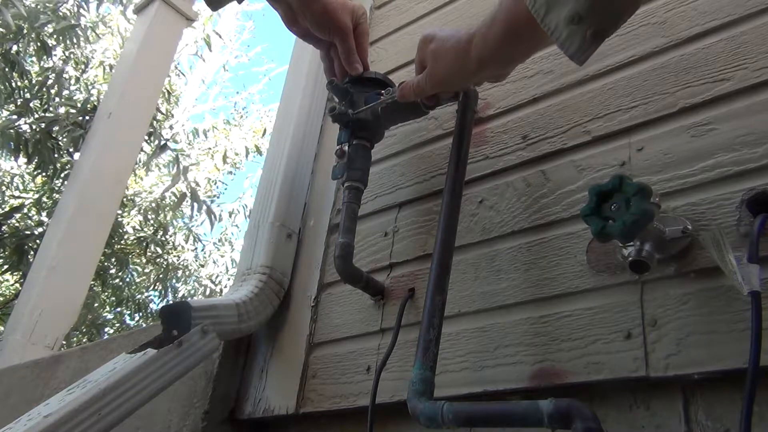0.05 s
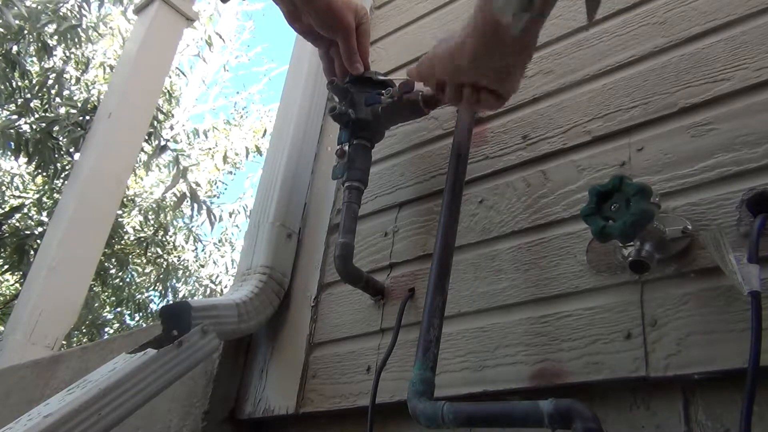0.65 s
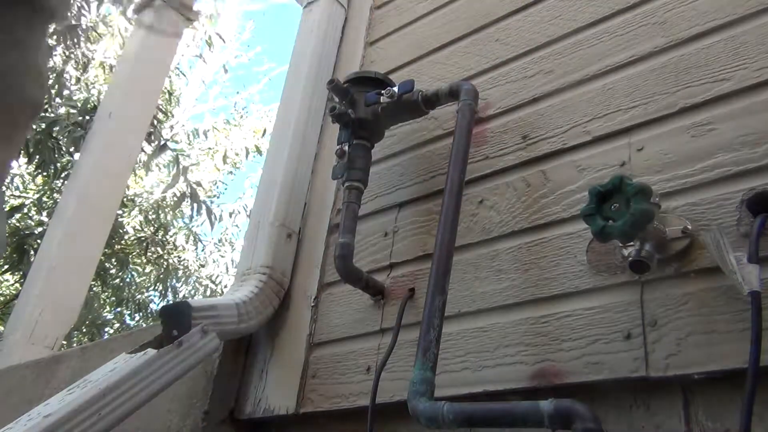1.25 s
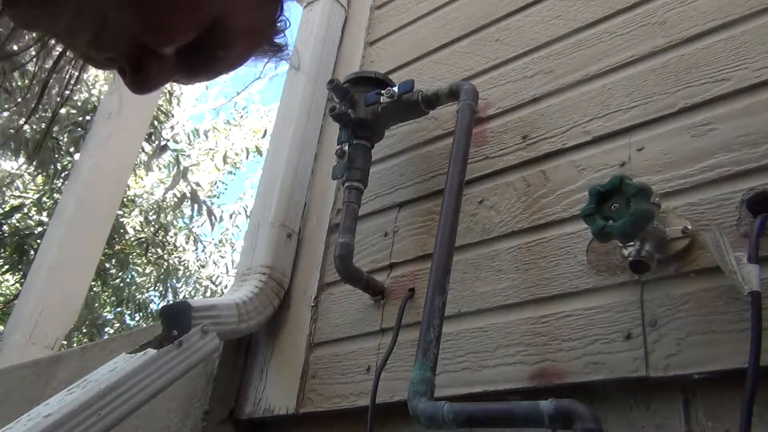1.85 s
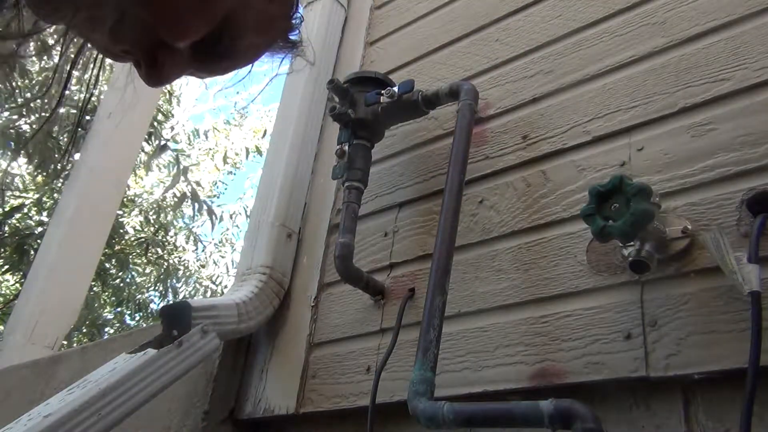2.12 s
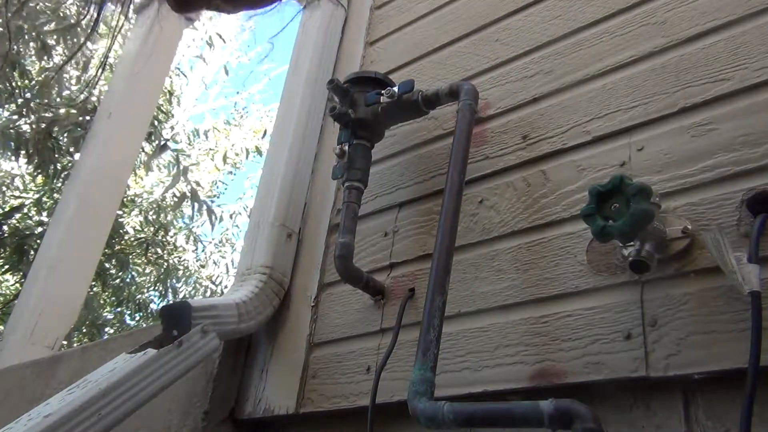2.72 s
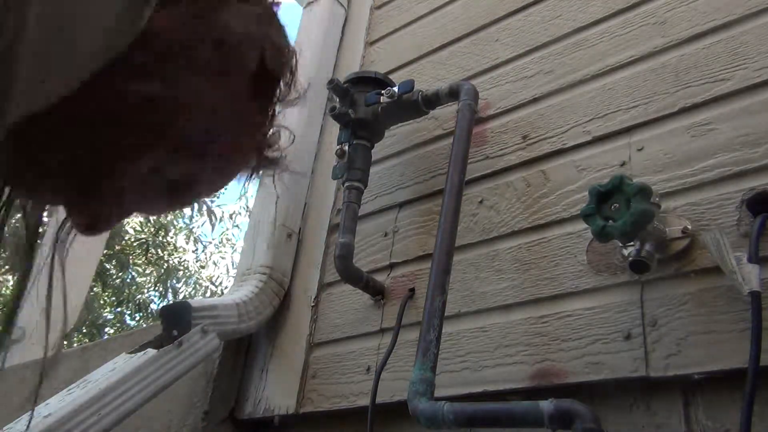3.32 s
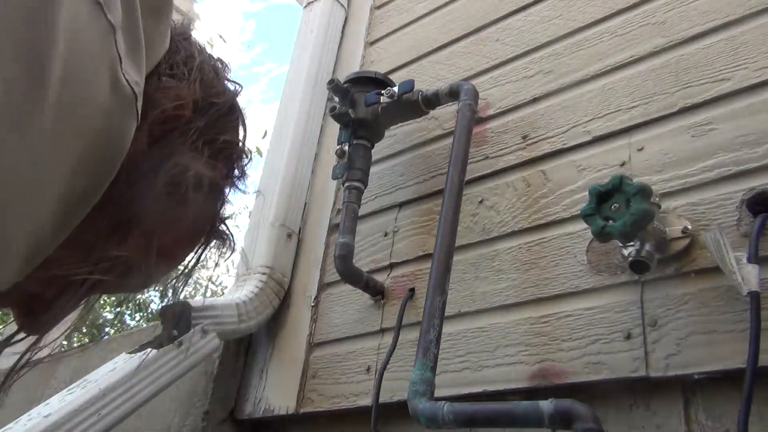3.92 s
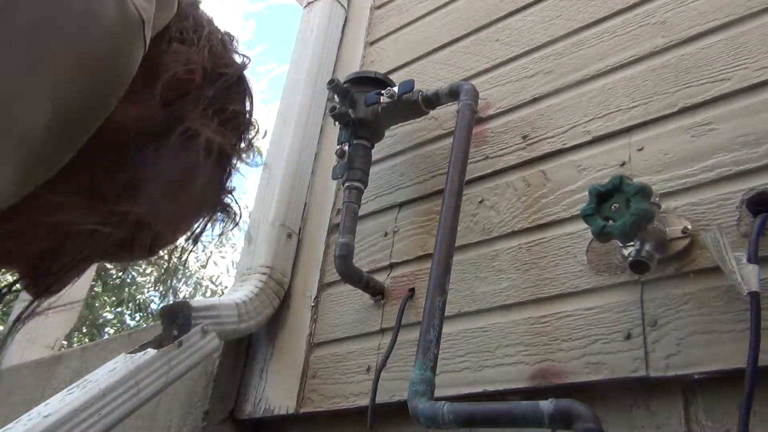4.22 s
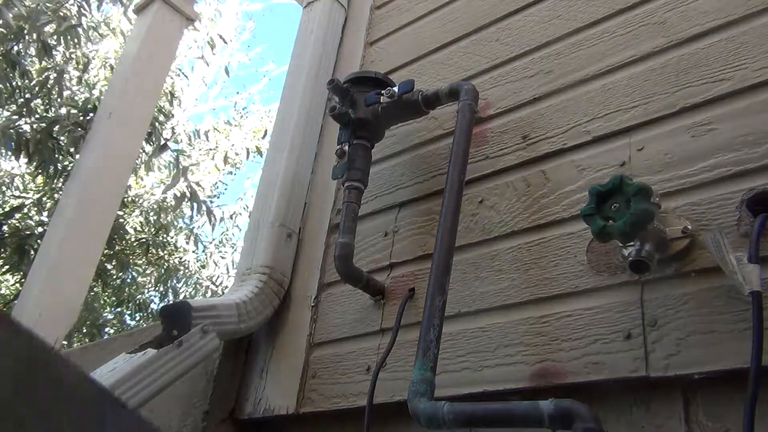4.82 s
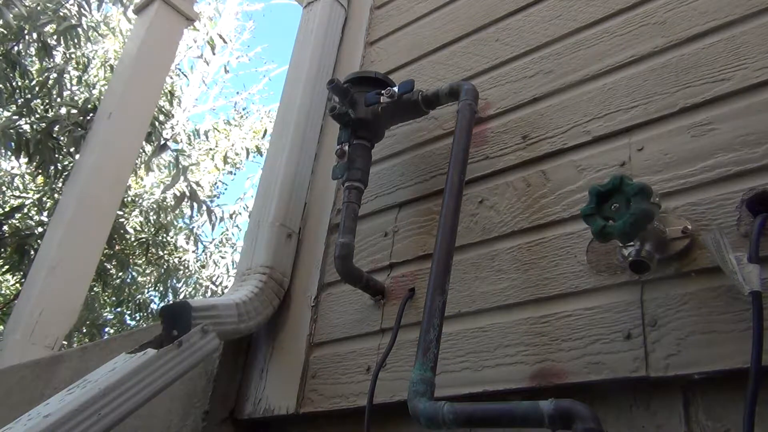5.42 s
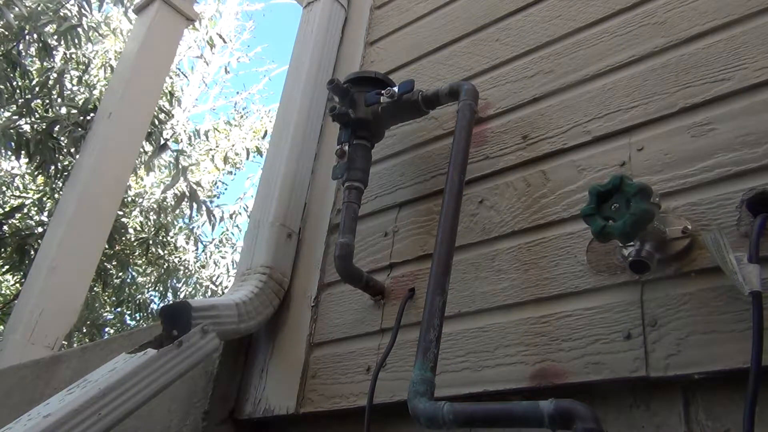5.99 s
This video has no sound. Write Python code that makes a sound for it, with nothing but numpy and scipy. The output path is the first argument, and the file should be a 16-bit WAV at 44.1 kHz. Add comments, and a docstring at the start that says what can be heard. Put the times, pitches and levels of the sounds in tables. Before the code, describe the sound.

Beside a house wall, a small metal valve on a pipe gives a few sharp clicks and a very faint squeak. Then a jacket moves right at the stereo microphone, rustling, crackling, rubbing and bumping on it with hollow knocks. Near the end the cloth drags loudly across the microphone twice. A faint, high insect buzz pulses over a soft outdoor hush throughout.

```python
"""Sprinkler valves and a close jacket

Beside a house wall, a hand works the small metal valves of a sprinkler pipe: a few sharp clicks.
Then someone moves right at the camera's stereo microphones: a jacket rustles, snaps, rubs and bumps
on the case and twice drags along it. One curve of body movement and a few held strokes drive the
cloth's friction. Farther off, an insect buzzes in the garden throughout."""
import sys
import numpy as np
from scipy import signal
from scipy.fft import rfft, irfft
from scipy.io import wavfile
from scipy.ndimage import uniform_filter1d

SR = 44100
rng = np.random.default_rng(int(sys.argv[2]) if len(sys.argv) > 2 else 0)


def to_wav(s):
    """Save 16-bit WAV."""
    ch = np.atleast_2d(s).T  # columns
    pcm = np.round(np.clip(ch, -1, 1) * 32767)  # PCM
    wavfile.write(sys.argv[1], SR, pcm.astype(np.int16))


N = 267025
TIME = np.arange(N) / SR
OPPOSED = np.array([[1], [-1]])  # opposite polarity in the left and right microphones

# how much the jacket moves, as the relative level of its hiss: t/s, level/dB
BODY_MOVEMENT = [(0.0, -60), (0.81, -59), (1.68, -48.5), (1.8, -43), (2.02, -42), (2.37, -56), (2.81, -47),
                 (2.95, -54), (3.17, -52), (3.42, -48.5), (3.61, -42), (3.94, -48), (4.19, -40),
                 (4.53, -49), (4.92, -43), (5.17, -49.5), (5.68, -54.5), (6.05, -54.5)]
# a sleeve brushes over the jacket: start/s, length/s, level/dB
SLEEVE_BRUSHES = [(0.81, 0.11, -46.5), (1.105, 0.043, -43.5), (1.27, 0.07, -47), (1.705, 0.18, -37.5),
                  (2.113, 0.058, -32), (2.465, 0.013, -36.5), (2.525, 0.018, -43), (2.618, 0.017, -41.5),
                  (2.699, .04, -39), (2.764, 0.05, -36.5), (2.915, 0.078, -40), (3.61, 0.058, -41.5),
                  (4.676, 0.072, -53)]
# the jacket rubs on the camera: start/s, length/s, scrape/dB, rumble/dB
CASE_RUBS = [(0, 0.014, -44, -41.5), (1.49, 0.14, -60, -42), (1.606, 0.041, -29.5, -31),
             (1.648, .02, -35.5, -21), (1.733, 0.055, -39, -28.5), (1.796, .15, -31, -22),
             (2.083, 0.024, -39, -20.5), (2.2, 0.16, -38.5, -60), (3.165, 0.028, -45, -50),
             (3.325, 0.049, -43, -50), (3.527, .22, -56, -40.5), (3.778, 0.032, -35, -22),
             (3.868, 0.044, -25, -28), (3.939, 0.094, -34.5, -32), (4.031, 0.11, -31.5, -25),
             (4.182, 0.032, -34, -24), (4.248, 0.047, -29, -19.5), (4.324, 0.091, -51, -31.5),
             (4.713, 0.16, -50, -46), (5.178, .22, -37, -54), (5.41, 0.23, -55, -47.5),
             (5.672, 0.046, -38, -43), (5.983, 0.087, -36, -46.5)]
# the jacket drags hard along the camera: start/s, length/s, level/dB
CASE_DRAGS = [(4.812, 0.039, -15), (4.969, 0.13, -14)]
# short scuffs of taut fabric: middle t/s, level/dB, f/Hz, half length/s
FABRIC_SCUFFS = [(1.302, -46, 4300, 0.061), (1.419, -46.5, 4740, 0.05), (1.655, -19, 2160, 0.0084),
                 (2.161, -21.5, 2470, 0.012), (2.233, -38.5, 1590, 0.02), (2.362, -22.5, 2100, 0.0064),
                 (2.818, -31, 5160, .02), (3.871, -32, 2180, 0.011), (3.902, -27, 3940, 0.0027),
                 (4.075, -35, 2560, 0.036), (4.21, -26, 2320, 0.014)]
# large folds snap over: t/s, level/dB, centre f/Hz, decay/s
FOLD_SNAPS = [(1.652, -19, 7900, 0.0048), (1.784, -15, 8750, 0.0029), (1.848, -25, 6500, 0.0032),
              (1.91, -28, 4500, .0026), (1.941, -35, 8360, .0022), (1.961, -29, 2540, .0025),
              (2.014, -28, 4400, .0035), (2.093, -29.5, 5040, .0027), (2.297, -33.5, 2940, 0.01),
              (2.358, -26, 4030, 0.0085), (2.473, -35.5, 3460, 0.0047), (2.525, -35.5, 4060, 0.0062),
              (2.564, -32, 3540, 0.0037), (2.708, -34, 6940, 0.0075), (2.817, -18, 6800, 0.0061),
              (3.066, -42, 4000, 0.0017), (3.135, -32.5, 4230, 0.0018), (3.151, -31.5, 7150, .0025),
              (3.174, -29, 6340, 0.0023), (3.343, -35.5, 4630, 0.0038), (3.439, -25.5, 3650, .0032),
              (3.489, -27.5, 4300, 0.0036), (3.552, -26, 3950, .0037), (3.622, -32, 4500, .0074),
              (3.757, -32.5, 9500, 0.0089), (4.295, -13, 5830, 0.0018), (4.465, -24.5, 8700, 0.0018),
              (4.677, -31.5, 10500, 0.0035), (4.919, -21.5, 3900, .0048), (5.107, -25, 2930, 0.0046)]
# bumps on the camera case: t/s, level/dB, centre f/Hz, decay/s
CASE_KNOCKS = [(1.119,-21,630,0.0036), (1.176,-28,860,0.0034), (1.5493,-19,820,0.0019),
               (1.644,-12,1210,0.0088), (1.961,-19.5,1070,0.0042), (2.094,-21.5,734,0.013),
               (2.874,-24,860,.0028), (2.993,-29,785,0.0032), (3.788,-7.5,1300,0.0061),
               (3.798,-14.5,1040,0.0049), (3.9515,-12.5,980,0.0096), (4.188,-22.5,1510,0.0059),
               (4.218,-20,1430,0.0018), (4.384,-23,825,0.015)]
# dull thumps of shifting weight: t/s, level/dB, top f/Hz, decay/s, sway of the stand/dB
WEIGHT_THUMPS = [(1.501, -35, 610, 0.0046, -58), (1.665, -27.5, 600, 0.006, -45),
                 (3.21, -28, 196, 0.014, -53), (3.621, -31, 199, 0.047, -42),
                 (3.798, -20.5, 553, 0.013, -28), (5.428, -29.5, 786, 0.022, -36.5),
                 (5.525, -28.5, 715, 0.015, -34.5), (5.701, -38.5, 445, 0.017, -31.5)]
# resonances of the camera and its stand: f/Hz, width/Hz, lift/dB
STAND_MODES = [(167, 22, 3), (211, 19.5, 7.5), (316, 25, 9), (439, 22, 6.5), (510.7, 14, 6), (635, 15, 9.5),
               (727, 27, 10), (890, 12, 7), (910, 14, 3.5), (1070, 40, 4), (1173, 20, 9), (1272, 9.5, 9),
               (1352, 11, 6), (1474, 22, 7), (1810, 14, 2), (2037, 26, 7), (2283, 28, 9.5), (2440, 38, 3)]

# valve clicks at the wall: t/s, level/dB, top f/Hz, decay/s, thud in the wall/dB
CLICKS = [(0.1842, -25, 5000, 0.0033, -33.5), (0.236, -39.5, 4000, 0.0033, -48),
          (0.4353, -33.5, 3780, 0.0072, -34.5), (0.6234, -23, 12000, 0.0043, -63),
          (0.631, -31, 4940, 0.014, -35), (0.864, -33.5, 4900, 0.0024, -33),
          (1.328, -29.5, 3670, 0.0037, -33)]
# resonances of the brass valve body, then of pipe and siding: f/Hz, width/Hz, level/dB
BRASS_MODES = [(1277, 80, 0), (1910, 59, -4), (2510, 74, -14), (3020, 490, 2.5), (4120, 88, -11),
               (4250, 150, 0), (4610, 80, -1), (6050, 330, -1), (7150, 310, 2), (8950, 160, 8),
               (11000, 300, 4)]
SIDING_MODES = [(211, 13, 0.5), (308, 83, -1), (464, 87, 2)]

# spectra of the cloth's friction and of the garden air: f/Hz, gain/dB
RUSTLE_SPECTRUM = [(300, -45), (1500, 6.5), (3000, 2.5), (5000, 1.5), (7000, 1), (10500, 2.5), (13000, -1),
                   (16000, -11)]
SCRAPE_SPECTRUM = [(120, -11.5), (220, -2.5), (400, 2), (700, 1), (1100, 2.5), (1600, -2), (2400, -2.5),
                   (3500, -12), (7000, -18)]
RUMBLE_SPECTRUM = [(30, -65), (60, -26), (100, -19), (140, -7), (172, -3.5), (215, -8.5), (270, -11),
                   (340, -34), (450, -13), (650, -24.5), (1200, -37), (3000, -56)]
DRAG_SPECTRUM = [(30, -43), (65, -26), (110, -5.5), (190, -4.5), (260, -4), (400, -3), (650, -1), (900, -3),
                 (1300, -7), (2500, -44)]
RASP_SPECTRUM = [(500, -12), (1050, -1), (1450, 6), (2000, 1), (2700, -3.5), (4000, -10.5), (6000, -15.5),
                 (10000, -13), (16000, -27)]
GARDEN_SPECTRUM = [(25, -25), (60, -5), (95, 7.5), (125, -2), (190, -1), (300, 0.5), (600, -4), (1300, -8),
                   (3000, -27), (8000, -32), (16000, -38)]
# the two microphone ports: f/Hz, phase spread/rad, left over right for the closest sounds/dB
MIC_PORTS = [(30, .3, -2), (100, 0.034, 4), (350, 0.063, 3), (700, 0.42, 2.5), (1300, 0.29, 2.5),
             (4000, 0.59, 2.1), (8200, 0.83, 1), (15000, 0.37, -.3)]


def rustle():
    """Close up, fine slips hiss and single threads tick, from folds spread left and right."""
    centre, wide = (
        coloured(slips(per_s=7000, spread_db=3.5, clump_db=3, clumps_per_s=170), RUSTLE_SPECTRUM)
        for _ in range(2))
    threads = slips(per_s=90, spread_db=2, clump_db=0, clumps_per_s=10)
    ticks = signal.fftconvolve(threads, contact(decay_s=0.0079, rise_s=0.0001))[:N]
    centre = unit_rms(centre) + from_db(-7.5) * unit_rms(coloured(ticks, RUSTLE_SPECTRUM))
    # the moving body reflects the hiss from a changing distance, so its colour shifts
    centre = reflected(centre, db=-13.5, delay_s=0.000518 * from_db(3.03 * drift(4.8)))
    stereo = microphones(centre, nearness=1) + from_db(-8.5) * unit_rms(wide) * OPPOSED
    return stereo * np.hypot(movement(), brushes())


def movement():
    """Gain of the jacket's steady hiss, which follows the moving body."""
    times, levels_db = np.transpose(BODY_MOVEMENT)
    rest_db, lift_db = -65.5, 5
    power = from_db(np.interp(TIME, times, levels_db)) ** 2 - from_db(rest_db) ** 2
    return from_db(lift_db) * np.sqrt(np.maximum(power, 0))


def brushes():
    """Gain of the sleeve's strokes over the jacket."""
    return sum(from_db(db) * stroke(start_s, length_s, attack_s=0.014, release_db_per_s=386)
               for start_s, length_s, db in SLEEVE_BRUSHES)


def rubbing():
    """Coarse slips scrape whenever the cloth slides; pressed on the camera they also rumble."""
    weave = coloured(slips(per_s=2600, spread_db=1.5, clump_db=3.5, clumps_per_s=120), SCRAPE_SPECTRUM)
    scrape = unit_rms(weave + stand(weave))
    pressed = slips(per_s=1200, spread_db=2, clump_db=2.5, clumps_per_s=35)
    rumble = unit_rms(stand(coloured(pressed, RUMBLE_SPECTRUM)))
    out = scrape * (from_db(-4) * brushes() + from_db(-9.5) * movement())
    for start_s, length_s, scrape_db, rumble_db in CASE_RUBS:
        envelope = stroke(start_s, length_s, attack_s=0.021, release_db_per_s=289)
        out += (from_db(scrape_db) * scrape + from_db(rumble_db) * rumble) * envelope
    return out


def drags():
    """Fast, hard sliding drives the stand's resonances, with a rasp on top; the case rings up slowly."""
    coarse = slips(per_s=5600, spread_db=4, clump_db=1.2, clumps_per_s=120)
    fine = slips(per_s=4000, spread_db=-0.5, clump_db=1.5, clumps_per_s=220)
    body = unit_rms(stand(coloured(coarse, DRAG_SPECTRUM)))
    rasp = from_db(-1.5) * unit_rms(stand(coloured(fine, RASP_SPECTRUM)))
    hum = from_db(0.5) * unit_rms(stand(band(rng.standard_normal(N), 620, 890)))
    out = np.zeros(N)
    for start_s, length_s, db in CASE_DRAGS:
        slowing = from_db(-45 * np.maximum(TIME - start_s, 0))  # the rasp fades as the cloth slows
        drag = body * stroke(start_s, length_s, attack_s=0.013, release_db_per_s=196)
        drag += slowing * rasp * stroke(start_s, length_s, attack_s=0.013, release_db_per_s=270)
        drag += hum * stroke(start_s, length_s, attack_s=0.15, release_db_per_s=239)
        out += from_db(db) * drag
    return out


def scuffs():
    """Ribs of the weave zip past at a nearly steady rate, so each scuff has a rough pitch."""
    out = np.zeros(N)
    t = TIME[:SR // 4] - 1 / 8
    for middle_s, db, hz, half_s in FABRIC_SCUFFS:
        swell = rng.standard_normal(len(t)) * np.exp(-(t / half_s) ** 2)
        place(out, middle_s + t[0], band(swell, hz * 0.84, hz * 1.11), db)
    return out


def snaps():
    """Large folds snap at their own moments; small ones crackle at random, as loud as the cloth moves."""
    out = np.zeros(N)
    for start_s, db, hz, decay_s in FOLD_SNAPS:
        place(out, start_s, fold(hz, decay_s), db)
    hiss_db = 20 * np.log10(np.hypot(movement(), brushes()) + 1e-6)
    folds_per_s, low_hz, high_hz = 20, 2800, 10600
    for when, softness, pitch in rng.random((int(folds_per_s * N / SR), 3)):
        db = hiss_db[int(when * N)] + 2 - softness
        hz = low_hz * (high_hz / low_hz) ** pitch
        place(out, when * N / SR, fold(hz, decay_s=0.0017), db)
    return out


def fold(hz, decay_s):
    """A fold buckles: a crackle with three brief resonances; small folds flick, large ones swell."""
    hit = contact(decay_s, rise_s=decay_s ** 2 / 0.019)
    crackle = band(hit, hz * 0.5, hz * 1.49)
    skirt = from_db(-15) * band(hit, 600, 13000, order=1)
    ring = sum(resonance(hit, min(hz * ratio, 14000), width_hz=480)
               for ratio in rng.uniform(0.574, 1.56, size=3))
    return band(crackle + skirt + from_db(-2) * ring, 300, 19000)


def knocks():
    """Soft bumps on the case give a hollow tock that rings on in the stand."""
    out = np.zeros(N)
    for start_s, db, hz, decay_s in CASE_KNOCKS:
        tock = band(contact(decay_s, rise_s=0.000087), hz * 0.54, hz * 1.34)
        place(out, start_s, tock + from_db(0.5) * stand(tock), db)
    return out


def thumps():
    """Low shoves set the stand swaying at one low resonance."""
    out, t = np.zeros(N), TIME[:SR // 3]
    sway = np.sin(2 * np.pi * 214 * t) * (1 - np.exp(-t / 0.0048)) * np.exp(-t / 0.031)
    for start_s, db, top_hz, decay_s, sway_db in WEIGHT_THUMPS:
        shove = band(contact(decay_s, rise_s=0.00062), 173, top_hz)
        place(out, start_s, stand(shove), db)
        place(out, start_s, sway, sway_db)
    return out


def stand(x):
    """Whatever touches the camera reaches the microphones ringing through its case and stand."""
    return x + sum((from_db(lift_db) - 1) * resonance(x, hz, width_hz)
                   for hz, width_hz, lift_db in STAND_MODES)


def valve():
    """Each click is a crack plus the ring of the brass body; the pipe passes a thud into the wall."""
    out = np.zeros(N)
    for start_s, db, top_hz, decay_s, thud_db in CLICKS:
        hit = contact(decay_s, rise_s=0.0001)
        scatter_db = rng.normal(0, 1.7, len(BRASS_MODES))
        ring = sum(from_db(mode_db + chance_db) * unit_rms(resonance(hit, hz, width_hz))
                   for (hz, width_hz, mode_db), chance_db in zip(BRASS_MODES, scatter_db))
        click = from_db(0.5) * unit_rms(ring) + unit_rms(hit)
        place(out, start_s, band(click, 690, top_hz, order=1), db)
        shove = contact(decay_s=0.0044, rise_s=0.0015)
        thud = sum(from_db(mode_db) * unit_rms(resonance(shove, hz, width_hz))
                   for hz, width_hz, mode_db in SIDING_MODES)
        place(out, start_s, band(thud, 160, 650), thud_db)
    return out


def squeaks():
    """The valve stem sticks and slips in its seal: a faint, unsteady tone at each of two turns."""
    wobbling_time = np.cumsum(1 + 0.0345 * drift(500)) / SR

    def turn(start_s, length_s, db, hz):
        envelope = stroke(start_s, length_s, attack_s=0.035, release_db_per_s=400)
        return from_db(db) * envelope * np.sin(2 * np.pi * hz * wobbling_time)

    return drift(200) * (turn(0.54, 0.26, db=-57, hz=2135) + turn(0.75, 0.36, db=-55, hz=3280))


def insect(hz, width_hz, first_s):
    """Each wing stroke scrapes a narrow resonance."""
    strokes_per_s = 17.6
    cycles = strokes_per_s * (TIME - first_s) + 0.023 * drift(3.3)
    pulses = np.exp(1.5 * (np.cos(2 * np.pi * cycles) - 1))
    return narrow_noise(hz, width_hz, envelope=pulses)


def garden():
    """Distant outdoor hush with a faint hum, and the insect's closing and opening strokes."""
    centre, wide = (unit_rms(coloured(noise, GARDEN_SPECTRUM)) for noise in rng.standard_normal((2, N)))
    hum = from_db(-60) * narrow_noise(hz=104, width_hz=21)
    closing = from_db(-56) * insect(hz=8380, width_hz=380, first_s=0.032)
    opening = from_db(-63) * insect(hz=8600, width_hz=250, first_s=0.0079)
    distant = from_db(-50.5) * centre + hum + closing + opening
    sides = from_db(-62.5) * band(wide, 380, 17000, order=1) * OPPOSED
    return microphones(distant, nearness=0.1) + sides


def reflected(x, db, delay_s):
    """A nearby surface adds one clear reflection, which combs the spectrum."""
    return x + from_db(db) * np.interp(TIME - delay_s, TIME, x, left=0)


def wall_echoes(x, db, decay_s):
    """Siding, eaves and ground scatter a short tail, different at each microphone."""
    t = TIME[:SR // 3]
    tail = band(rng.standard_normal((2, len(t))), 130, 9600, order=1)
    tail *= np.exp(-t / decay_s) * (t > 0.004)
    tail /= np.sqrt(np.sum(tail ** 2, axis=1, keepdims=True))
    return from_db(db) * signal.fftconvolve(x[None], tail, axes=1)[:, :N]


def microphones(x, nearness):
    """Scatter on the case ripples the phase between the two ports; near sounds favour the left."""
    hz, spread_rad, left_db = np.transpose(MIC_PORTS)
    ripple = np.sqrt(2) * np.sin(2 * np.pi * np.fft.rfftfreq(N, 1 / SR) / 830)
    phase = -per_bin(hz, spread_rad) * ripple
    left = from_db(nearness * per_bin(hz, left_db) / 2) * np.exp(1j * phase / 2)
    return irfft(rfft(x) * np.array([left, 1 / left]), N)


def slips(per_s, spread_db, clump_db, clumps_per_s):
    """Friction: threads catch and let go at random, in uneven sizes and in clumps."""
    sizes = from_db(spread_db * np.minimum(rng.exponential(1, N), 4))
    signs = rng.choice([-1, 1], N)
    lets_go = rng.random(N) < per_s / SR
    clumps = from_db(clump_db * np.clip(drift(clumps_per_s), -2, 1))
    return unit_rms(sizes * signs * lets_go) * clumps


def contact(decay_s, rise_s):
    """One touch: a burst of tiny impacts that swells and dies away."""
    t = TIME[:SR // 4]
    impacts = rng.choice([-1, 1], len(t)) * rng.uniform(0.35, 1, len(t))
    return impacts * (1 - np.exp(-t / rise_s)) * np.exp(-t / decay_s)


def stroke(start_s, length_s, attack_s, release_db_per_s):
    """Gain of one sliding gesture: it rises, holds to the end of its length and dies away."""
    t = TIME - start_s
    return np.clip(t / attack_s, 0, 1) * from_db(-np.clip(release_db_per_s * (t - length_s), 0, 200))


def place(out, start_s, sound, db):
    """Mix in a sound so that its loudest 4 ms have the given level."""
    start = int(start_s * SR)
    loudest = np.sqrt(uniform_filter1d(sound ** 2, SR // 250).max())
    out[start:start + len(sound)] += (sound * from_db(db) / loudest)[:N - start]


def drift(per_s):
    """Random wander with an rms of 1, gliding to per_s new values a second."""
    return unit_rms(np.interp(TIME * per_s, np.arange(N), rng.standard_normal(N)))


def narrow_noise(hz, width_hz, envelope=1):
    """Noise passed twice through one resonance: a rough tone with an rms of 1."""
    noise = rng.standard_normal(N) * envelope
    return unit_rms(resonance(resonance(noise, hz, width_hz), hz, width_hz))


def resonance(x, hz, width_hz):
    """Two-pole band-pass with gain 1 at its peak."""
    radius = np.exp(-np.pi * width_hz / SR)
    feedforward = np.array([1, 0, -1]) * (1 - radius ** 2) / 2
    feedback = [1, -2 * radius * np.cos(2 * np.pi * hz / SR), radius ** 2]
    return signal.lfilter(feedforward, feedback, x + 1e-18)


def band(x, low_hz, high_hz, order=2):
    """Butterworth band-pass, at least an octave wide."""
    edges_hz = [min(low_hz, high_hz / 2), high_hz]
    return signal.sosfilt(signal.butter(order, edges_hz, "band", fs=SR, output="sos"), x)


def coloured(x, spectrum):
    """Shape a sound with a table of gains over frequency."""
    hz, db = np.transpose(spectrum)
    return irfft(rfft(x) * from_db(per_bin(hz, db)), N)


def per_bin(hz, values):
    """Values interpolated over log frequency at every FFT bin."""
    return np.interp(np.log(np.fft.rfftfreq(N, 1 / SR) + 1), np.log(hz), values)


def from_db(db):
    return 10 ** (np.asarray(db) / 20)


def unit_rms(x):
    return x / np.sqrt(np.mean(x ** 2) + 1e-20)


def scene():
    """The jacket right at the microphones, the valves at the wall, their echoes and the garden beyond."""
    pipework = valve() + squeaks()
    cloth = reflected(rubbing() + scuffs() + snaps(), db=-26, delay_s=0.005)
    near = cloth + knocks() + thumps() + drags()
    # each microphone also feels some friction of its own
    sides = (from_db(-17.5) * rubbing() + from_db(-14.5) * drags()) * OPPOSED
    direct = microphones(pipework, nearness=0.092) + microphones(near, nearness=0.78) + sides + rustle()
    echoes = wall_echoes(pipework, db=-24, decay_s=0.038) + wall_echoes(near, db=-17, decay_s=0.017)
    return direct + echoes + garden()


def record(dry):
    """The microphone input sheds rumble below 35 Hz, rounds the peaks and cuts the top at 16 kHz."""
    thinned = signal.sosfilt(signal.butter(1, 35, "high", fs=SR, output="sos"), dry)
    rounded = 1.31 * np.tanh(thinned / 1.488)
    return signal.sosfilt(signal.ellip(10, 0.2, 70, 16000, fs=SR, output="sos"), rounded)


dry = scene()
out = record(dry)
to_wav(out)
```